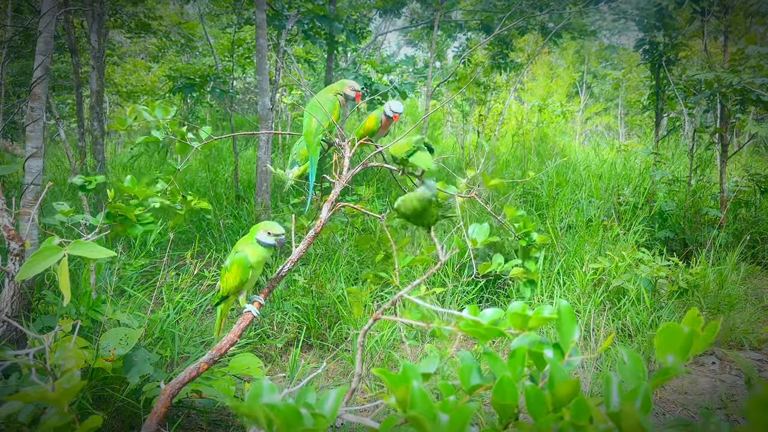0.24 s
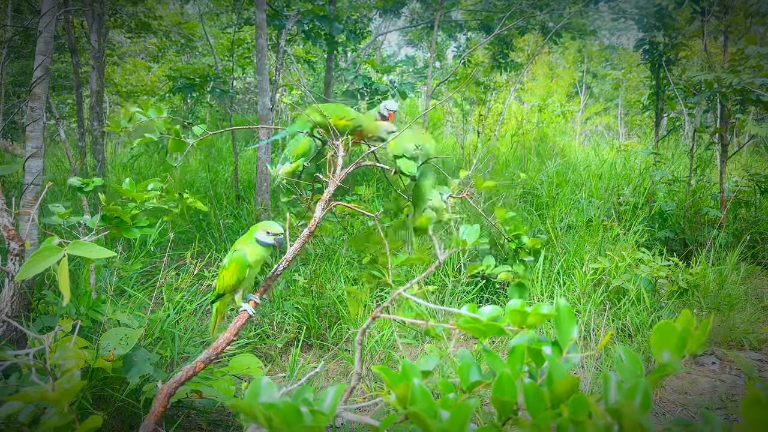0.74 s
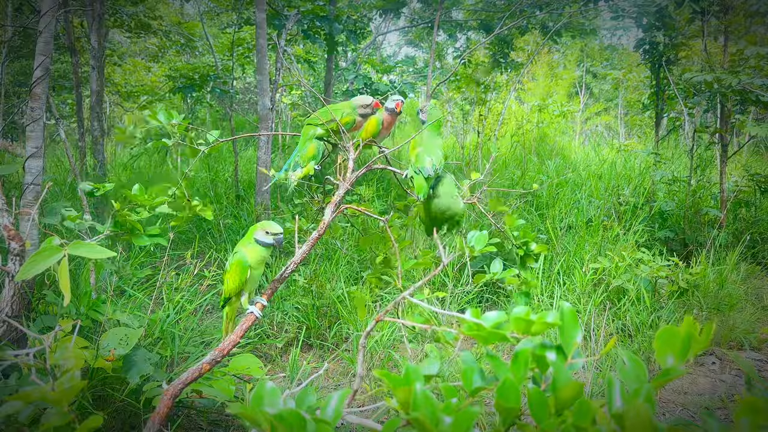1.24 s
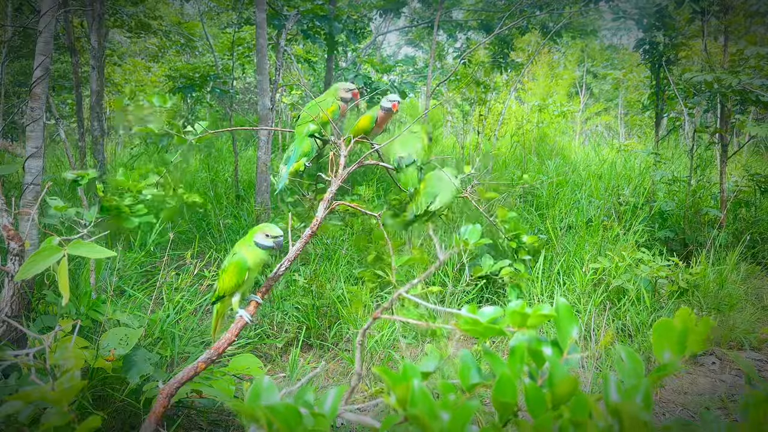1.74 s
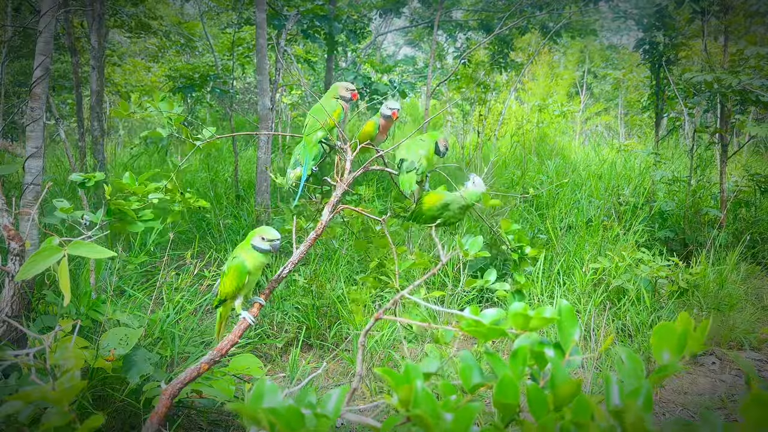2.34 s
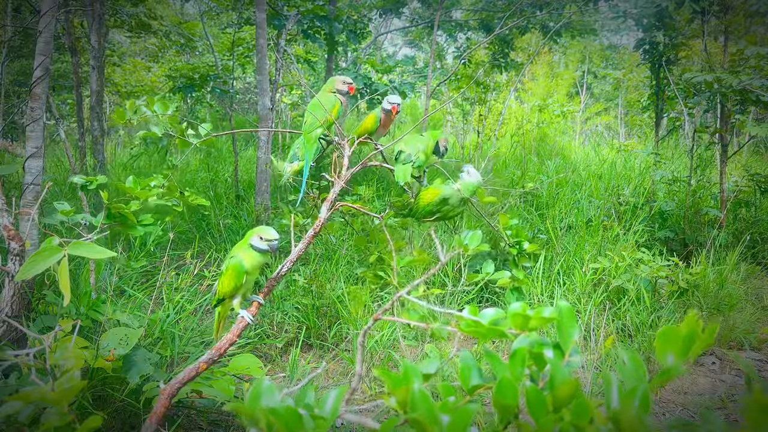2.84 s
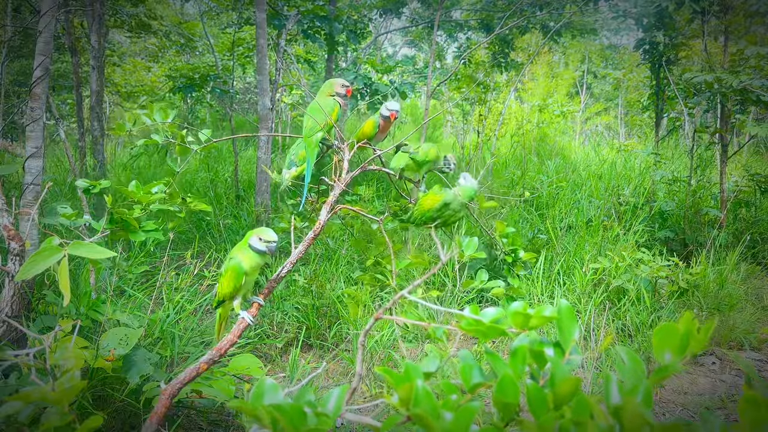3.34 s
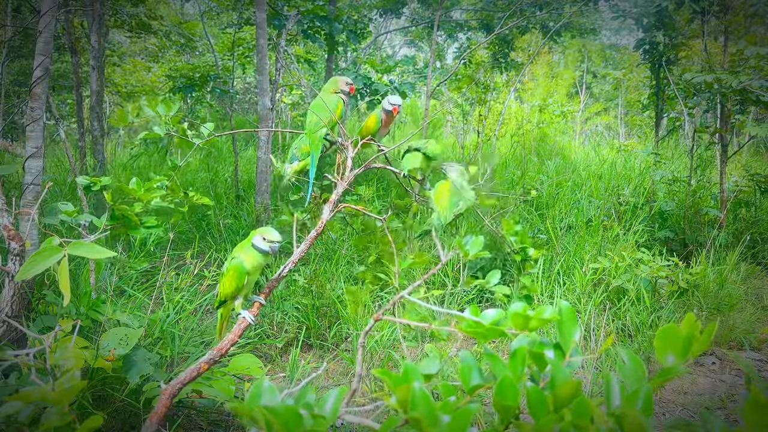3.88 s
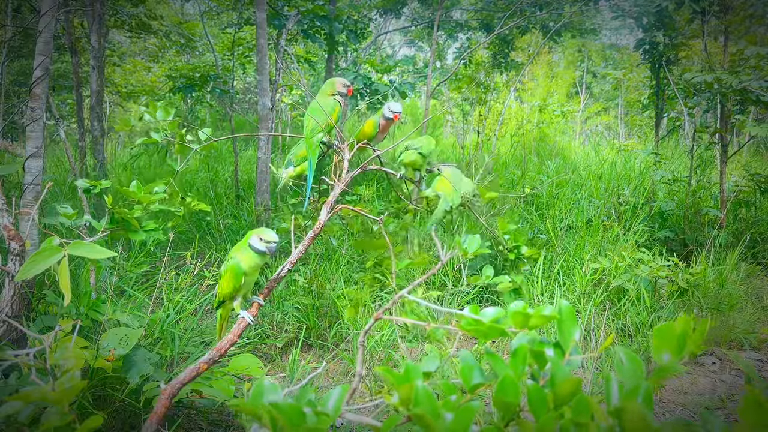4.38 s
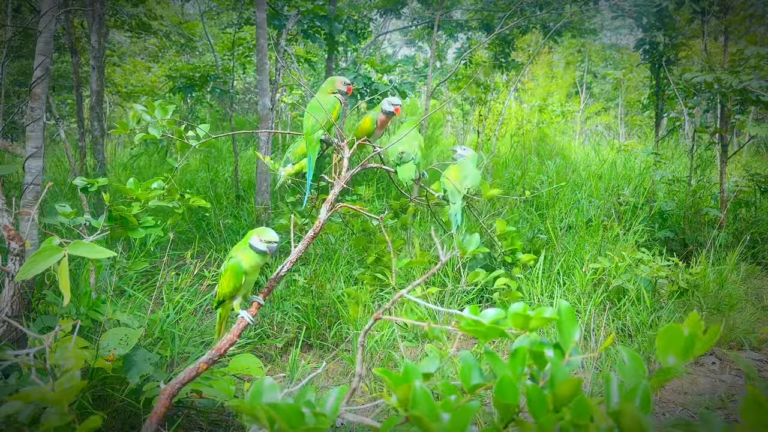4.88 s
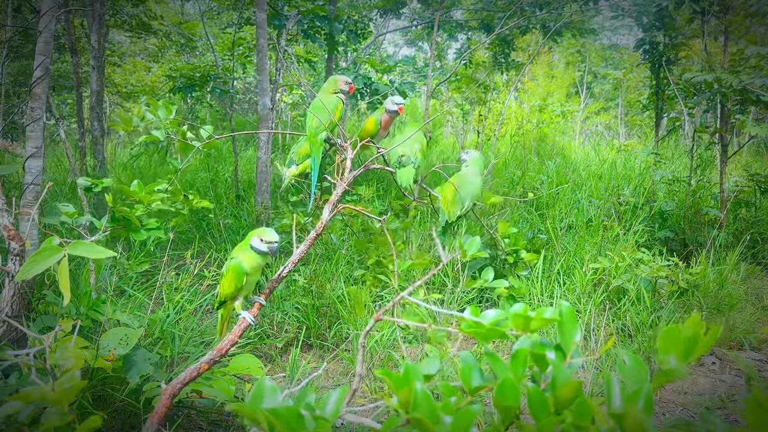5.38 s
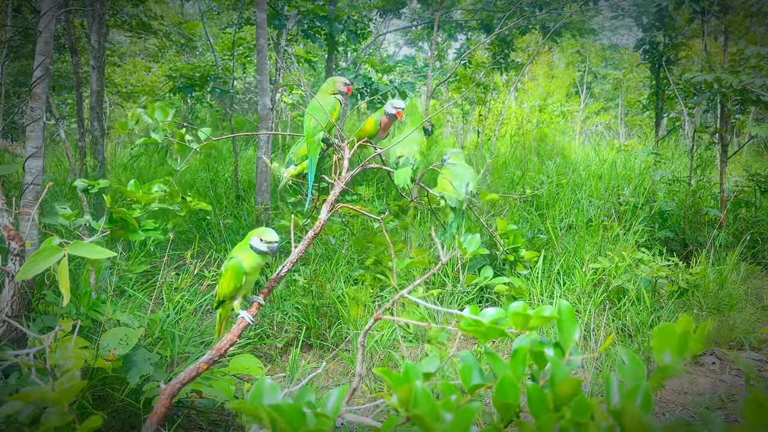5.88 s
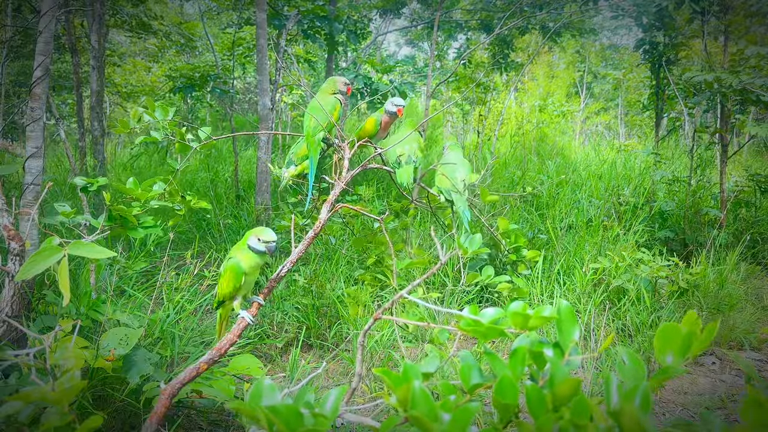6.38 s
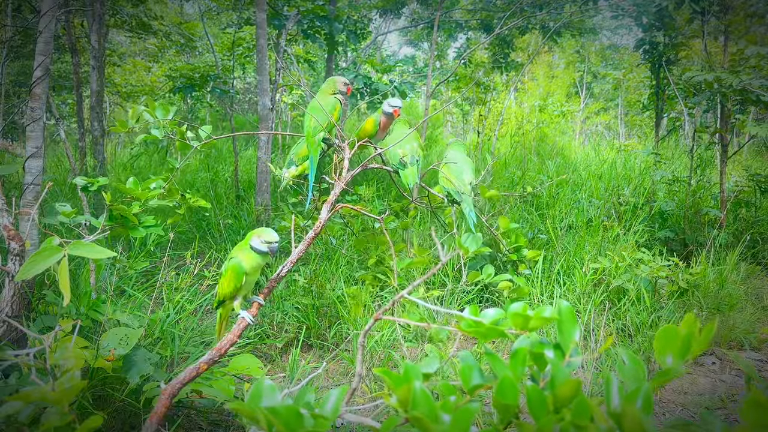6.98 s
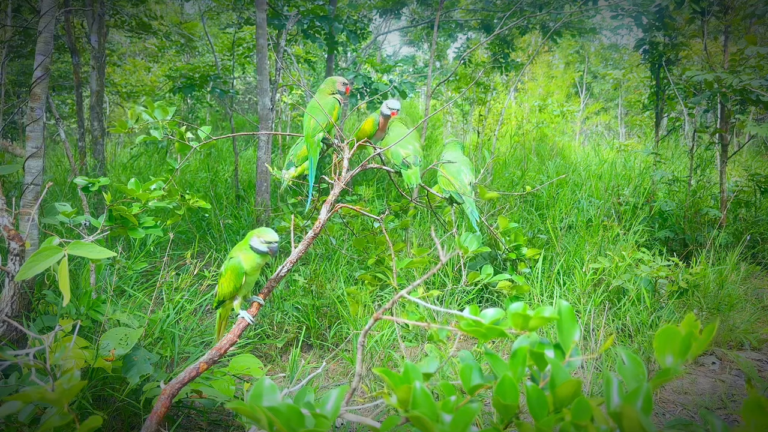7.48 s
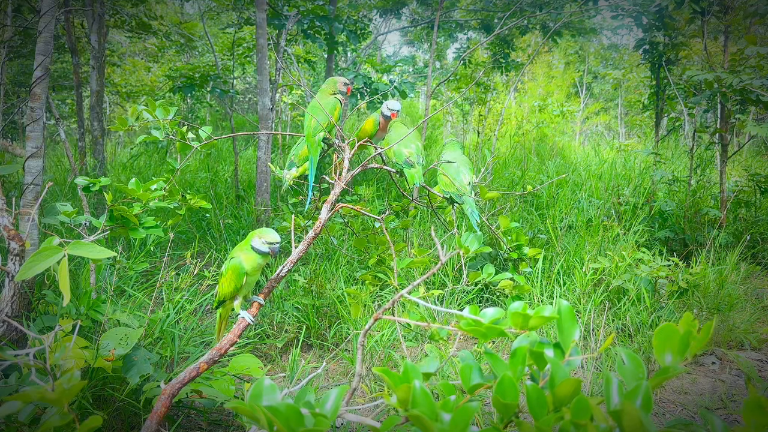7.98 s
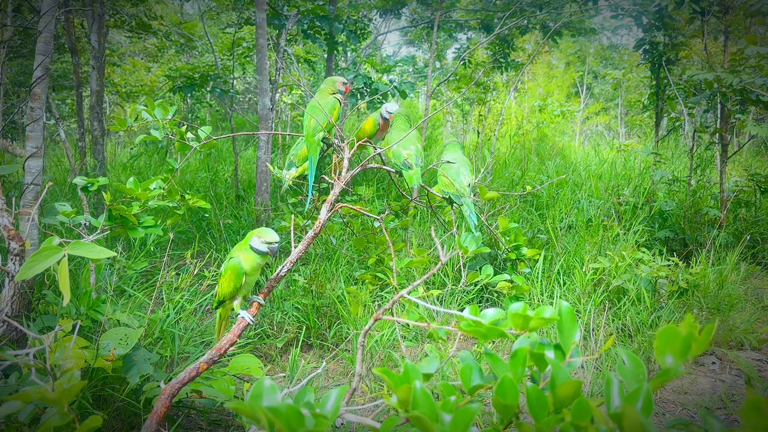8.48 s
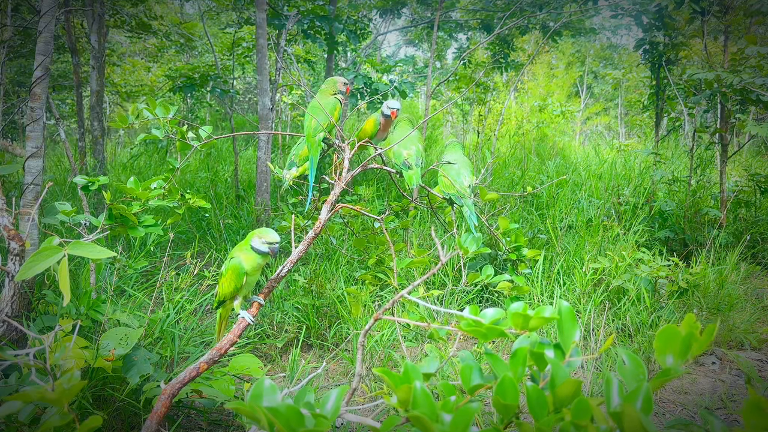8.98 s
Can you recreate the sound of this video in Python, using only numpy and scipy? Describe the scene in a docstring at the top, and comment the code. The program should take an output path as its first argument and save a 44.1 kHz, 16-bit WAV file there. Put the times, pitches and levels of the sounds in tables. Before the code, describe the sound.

Steady, quiet forest air with a low rumble and a faint short echo from trees. Tiny dry twig clicks open the scene while a distant small bird repeats thin, rising high pips. Nearby parakeets break into quick clucks, nasal buzzes, bent yelps and an octave-cracking screech, pause, then bicker again through a wail and another screech. After a long calm gap, a few soft chuks end it, close and nearly dry.

```python
"""Parakeets bickering in a forest

Parakeets squabble on a branch close by: slow voice pulses make rasps, chuks and chatters,
while a fast-beating voice sings pitched yelps, wails and screeches that crack up about an octave.
A small bird farther off pips with a thin sliding whistle; claws and twigs tick with a snap and a short ring.
Shaped noise makes the soft forest hiss, and a fading noise tail gives the faint echo of the trees."""
import sys
import numpy as np
from scipy import signal
from scipy.fft import rfft, irfft, next_fast_len
from scipy.io import wavfile

SR = 44100
rng = np.random.default_rng(int(sys.argv[2]) if len(sys.argv) > 2 else 0)


def dump_mix(stems):
    """Bounce the given channels to the path in sys.argv[1] as a 16-bit WAV at rate SR."""
    frames = np.atleast_2d(stems).T  # one column per channel
    limited = np.clip(frames, -1, 1)  # hard clip at full scale
    pcm = np.round(limited * 32767).astype(np.int16)
    wavfile.write(sys.argv[1], SR, pcm)


N = 407043  # length in samples
EDGE_HZ = 15850  # top of the recorded band


def amp(db):
    """Turns decibels into a gain."""
    return 10 ** (np.asarray(db) / 20)


def evened(x):
    """Scales a sound to an average (rms) strength of 1."""
    return x / np.sqrt(np.mean(x ** 2) + 1e-20)


def ramp(x):
    """Holds x between 0 and 1."""
    return np.clip(x, 0, 1)


def bump(t, width):
    """A bell curve of height 1 around t = 0."""
    return np.exp(-(t / width) ** 2)


def read(points, hz):
    """Reads a curve between its points, with frequency on a log scale."""
    f, value = np.transpose(points)
    return np.interp(np.log(hz + 1), np.log(f + 1), value)


def add(mix, s, sound):
    """Mixes a sound in at time s, in seconds."""
    part = mix[max(round(s * SR), 0):][:len(sound)]
    part += sound[:len(part)]


def played(source, events):
    """Lays the events of one source along the time line."""
    track = np.zeros(N)
    for event in events:
        add(track, *source(event))
    return track


def wobble(size, hz):
    """A smooth random curve of rms about 1; changes much faster than hz are faded out."""
    padded = next_fast_len(size + 2048, True)
    f = np.fft.rfftfreq(padded, 1 / SR)
    spectrum = rfft(rng.standard_normal(padded)) * np.exp(-(f / hz) ** 2)
    return evened(irfft(spectrum, padded))[:size]


def colour(x, gain_db, size=1024):
    """Filters x by a gain in dB given as a function of frequency, with no sound before its cause."""
    f = abs(np.fft.fftfreq(size, 1 / SR))
    log_gain = np.log(amp(np.maximum(gain_db(f), -100)))
    # the Hilbert transform finds the phase that packs the response after time zero
    taps = np.fft.ifft(np.exp(np.conj(signal.hilbert(log_gain)))).real
    return signal.fftconvolve(x, taps[:size // 2])


def low_cut_db(f, cut_hz):
    """Steep loss, up to 40 dB, below the lowest note that a small throat can radiate."""
    return np.minimum(10 * np.log10(1 + (cut_hz / (f + 1)) ** 8), 40)


def swell(u, crest, rise_db, fall_db, curve=1.87):
    """Level in dB of a note that grows to a crest and dies away; u runs from 0 to 1."""
    crest = np.clip(crest, .05, .95)
    before, after = ramp(1 - u / crest), ramp((u - crest) / (1 - crest))
    return -rise_db * before ** curve - fall_db * after ** curve


# tone balance of the forest air: pitch_hz, relative_level_db
AIR = [(15, -60), (25, -32), (41, -24), (64, 1.5), (148, -1), (222, -3), (316, -4), (352, -5), (749, -6),
       (834, -4.5), (1060, -5), (5090, -9), (7830, -19), (8730, -26), (15800, -47.5)]
AIR_LEVEL_DB = -59.5


def air():
    """Steady forest hiss over a low rumble: random noise shaped in frequency."""
    size = next_fast_len(N, True)
    hz = np.fft.rfftfreq(size, 1 / SR)
    spectrum = rfft(rng.standard_normal(size)) * amp(read(AIR, hz))
    return amp(AIR_LEVEL_DB) * evened(irfft(spectrum, size)[:N])


# echo of the trees: pitch_hz, time_to_fade_60_db_s
TREES = [(400, 0.29), (1500, 0.42), (3000, 0.39), (8000, 0.57), (14000, .2)]


def forest(x, near_db=3, near_fade_s=0.11):
    """Nearby leaves scatter a quick echo; the trunks return a longer, fainter one."""
    hz, t, noise = signal.stft(rng.standard_normal(SR), SR, nperseg=256)
    trunks = amp(-60 * t / read(TREES, hz)[:, None])
    leaves = amp(near_db - 60 * t / near_fade_s)
    late = t > .004  # the echo leaves out the first moment
    tail = signal.istft(noise * (trunks + leaves) * late, SR, nperseg=256)[1]
    return signal.fftconvolve(x, tail / np.linalg.norm(tail))[:N]


# claws and twigs: start_s, peak_db, snap_db (noise of the snap, before the whole tick is set to its peak)
TICKS = [(.02, -37.5, -16), (0.42, -40, -3), (.515, -33.5, -18), (0.524, -30, -14), (.537, -33, -12),
         (.578, -32.5, -14), (.592, -34.5, -13), (0.613, -36.5, -10), (.637, -38, -13), (3.468, -35.5, 7),
         (3.498, -36.5, -8), (3.796, -37, -1)]
# ringing tones of a twig: pitch_hz (before a random shift), relative_level_db, time_to_fade_60_db_s
TWIG = [(1550, 8, .012), (2220, 2, 0.0097), (3350, 9, .009), (4200, 3, 0.0092), (4540, -2.5, 0.027)]


def tick(row, snap_fade_s=.0006):
    """A tiny noise snap and the short ring of a twig, tuned a little differently each time."""
    s, peak_db, snap_db = row
    t = np.arange(1024) / SR
    ring = np.zeros(len(t))
    for hz, db, fade_s in TWIG:
        shifted_hz = hz * rng.uniform(0.866, 1.13)
        ring += amp(db - 60 * t / fade_s) * np.sin(2 * np.pi * shifted_hz * t)
    snap = amp(snap_db) * rng.standard_normal(len(t)) * np.exp(-t / snap_fade_s)
    click = ring + snap
    return s, amp(peak_db) * click / abs(click).max()


# pips of the small bird: start_s
PIPS = [0.216, .474, 0.713, 1.02, 1.267, 1.527, 2.592, 2.775, 2.99, 3.194, 3.392, 3.613, 3.815, 4.024,
        4.272, 4.626, 4.84]
PIP_DB = -58.5
# each pip begins near PIP_HZ; early ones begin higher and the series settles
PIP_HZ, PIP_EAGER_HZ, PIP_SETTLE_S = 7410, 650, 0.69


def pip(s, length=0.018, rise_hz=850):
    """A thin whistle that slides up, levels off and fades."""
    start_hz = PIP_HZ + PIP_EAGER_HZ * np.exp(-s / PIP_SETTLE_S)
    u = np.linspace(0, 1, int(length * SR))
    turns = np.cumsum(start_hz + rise_hz * np.sin(np.pi * u / 2)) / SR
    whistle = np.sqrt(2) * np.sin(2 * np.pi * turns)
    return s, amp(PIP_DB - 5 * u) * whistle * signal.windows.tukey(len(u), .5)


# the throat with the beak nearly shut, also used for the breath noise of squawks: pitch_hz, gain_db
NARROW_THROAT = [(300, -8.5), (600, -7), (1250, -1.5), (1750, 3), (2150, -2.5), (2650, -2), (3600, -1.5),
                 (4900, -1), (5600, -10), (6500, -21.5), (7900, -21.5), (10000, -28), (11000, -34),
                 (15500, -39)]


def pulsed(s, length, first_hz, last_hz, rough, level_db, crest, bright, cut_hz, throat_hz, beak_hz,
           jitter=.18, uneven_db=1.5, puff_turns=0.44, puff_gain=1.7, rise_db=11, fall_db=16,
           scatter_s=.0012, scatter_gain=0.56, peak_db=6.0, throat_width_hz=340, beak_width_hz=560):
    """Separate pulses of the voice organ, each with a puff of noise, ring the throat and the beak."""
    size = int(max(length, .004) * SR)
    u, rough = np.linspace(0, 1, size), ramp(rough)
    # a rougher voice has a shakier pulse rate
    shake = np.exp((0.022 + jitter * rough) * wobble(size, 400))
    hz = (first_hz + (last_hz - first_hz) * u) * shake
    turns = np.cumsum(hz) / SR - .05
    pulses = np.sinc((turns - np.round(turns)) * SR / hz)
    # harsher puffs last longer
    puffs = rng.standard_normal(size) * np.exp(-(turns % 1) / (puff_turns * (1 + rough)))
    drive = (1 - rough) * evened(pulses) + puff_gain * rough * evened(puffs)
    shape_db = swell(u, crest, rise_db, fall_db, curve=1.47)
    drive *= amp(shape_db + uneven_db * rough * wobble(size, 220))

    def throat_db(f):
        """Two resonances differ from note to note; brightness tilts the treble and a low cut thins the bass."""
        throat_peak = 1 / (1 + ((f - throat_hz) / throat_width_hz) ** 2)
        beak_peak = 1 / (1 + ((f - beak_hz) / beak_width_hz) ** 2)
        tilt_db = bright * np.log2(np.maximum(f / 1500, 1))
        return read(NARROW_THROAT, f) + peak_db * (throat_peak + beak_peak) + tilt_db - low_cut_db(f, cut_hz)

    # the branch and nearby leaves scatter each pulse within a few milliseconds
    t = np.arange(256) / SR
    scatter = rng.standard_normal(len(t)) * np.exp(-t / scatter_s)
    direct = t == 0
    echoes = scatter_gain * scatter * (t > 0) / np.linalg.norm(scatter)
    voice = signal.fftconvolve(colour(drive, throat_db), direct + echoes)
    return s, amp(level_db) * voice / np.sqrt((voice ** 2).sum() / size)


# runs of tiny clucks: start_s, clucks (count), first_gap_s, gap_growth (times per cluck), level_db (first cluck),
# gain_per_cluck_db, brightness_db_per_octave, throat_hz, beak_hz
CHATTERS = [(1.311, 7, .016, .91, -46, 0, -2.5, 1720, 5200),
            (4.857, 5, 0.017, .97, -45, 1.43, -1, 1214, 4970),
            (6.2107, 7, .0098, 1.15, -45.5, 0.26, -7.5, 1320, 2900)]
CLUCK_SHARE = 0.67  # a cluck fills this share of its gap
CLUCK_FIRST_HZ, CLUCK_LAST_HZ, CLUCK_CUT_HZ = 550, 440, 610


def chatter(row, rough=0.46, crest=0.1):
    """A run of pulsed clucks that steadily quickens or slows."""
    s, count, first_gap, growth, level_db, step_db, bright, throat_hz, beak_hz = row
    gaps = first_gap * growth ** np.arange(round(count))
    run = np.zeros(SR)
    for k, gap in enumerate(gaps):
        cluck = pulsed(gaps[:k].sum(), CLUCK_SHARE * gap, CLUCK_FIRST_HZ, CLUCK_LAST_HZ, rough,
                       level_db + k * step_db, crest, bright, CLUCK_CUT_HZ, throat_hz, beak_hz)
        add(run, *cluck)
    return s, run


# short clucking notes: start_s, length_s, first_pitch_hz, last_pitch_hz, level_db, brightness_db_per_octave
CHUKS = [(1.044, 0.02, 1640, 1820, -36.5, -1), (1.231, 0.0095, 481, 375, -40.5, 1.5),
         (1.265, 0.016, 404, 400, -51, 9), (1.284, .019, 1447, 1003, -33, 0),
         (1.393, 0.016, 803, 597, -43.5, -3.5), (1.407, 0.015, 610, 505, -36, 2),
         (1.438, .019, 379, 294, -36.5, 1.5), (1.469, 0.022, 806, 633, -25.5, 0.5),
         (1.48, 0.042, 1267, 932, -36, -2), (1.547, 0.025, 417, 362, -45, 0.5),
         (1.603, 0.0062, 690, 600, -34.5, 0.5), (1.614, 0.0094, 910, 697, -27, 3.5),
         (1.627, 0.025, 797, 607, -35.5, -1.5), (1.649, .025, 715, 600, -40.5, -1.5),
         (1.808, 0.014, 1094, 524, -34.5, -12.5), (4.357, 0.026, 623, 303, -37.5, -6.5),
         (4.527, .017, 700, 573, -35.5, -5), (4.541, 0.018, 650, 808, -35, -5),
         (4.783, 0.031, 1020, 787, -35, -1.5), (5.447, 0.015, 602, 506, -35, -7),
         (5.468, 0.015, 650, 550, -43.5, -4.5), (6.115, 0.0115, 750, 803, -34.5, -0.5),
         (6.162, 0.0045, 500, 450, -53, -6), (6.323, 0.027, 355, 497, -39, -5.5),
         (6.34, 0.027, 536, 886, -29, -4.5), (6.485, .019, 1170, 560, -46.5, -18),
         (8.537, .015, 864, 743, -36.5, -4), (8.57, 0.0088, 746, 700, -50.5, -8),
         (8.592, 0.012, 594, 400, -50.5, -6), (8.852, 0.0083, 1196, 850, -36.5, -5.5),
         (8.889, 0.023, 856, 562, -44.5, -5), (9.105, 0.013, 756, 792, -34, -4),
         (9.143, 0.031, 727, 477, -48.5, -6)]
# the throat opens with the effort of a chuk: level_db, throat_hz
CHUK_THROAT = [(-38, 1090), (-35, 2530)]
# the shortest chuks are the noisiest, longer ones settle into a voice: length_s, roughness_0_to_1
CHUK_SETTLING = [(.011, 0.43), (.017, 0.31), (.026, .12)]
# the beak opens with brightness: brightness_db_per_octave, beak_hz
CHUK_BEAK = [(-7, 2200), (-0.5, 4360)]
CHUK_CREST, CHUK_CUT_HZ = 0.22, 510  # place of the crest (0-1), low cut


def chuk(row):
    """A quick gliding burst of pulses; louder raises the throat resonance, brighter raises the beak's."""
    s, length, first_hz, last_hz, level_db, bright = row
    rough = np.interp(length, *np.transpose(CHUK_SETTLING))
    throat_hz = np.interp(level_db, *np.transpose(CHUK_THROAT))
    beak_hz = np.interp(bright, *np.transpose(CHUK_BEAK))
    return pulsed(s, length, first_hz, last_hz, rough, level_db, CHUK_CREST, bright,
                  cut_hz=CHUK_CUT_HZ, throat_hz=throat_hz, beak_hz=beak_hz)


# rasps and nasal buzzes: start_s, length_s, pulse_rate_hz (mid-note), roughness_0_to_1, level_db,
# crest_place_0_to_1, brightness_db_per_octave, throat_hz
RASPS = [(0.768, .095, 265.3, 0.27, -41.5, .08, -4.5, 1780), (1.058, 0.069, 152, 0.68, -28, 0.33, 5, 1940),
         (1.888, 0.12, 139.1, 0.61, -31, 0.37, 2.5, 1700), (2.048, 0.052, 138, 0.34, -41, 0.28, -2, 1120),
         (2.089, 0.0404, 300, 0.4, -40.5, 0.8, -3.5, 1680), (2.146, .035, 232, 0.8, -43.5, 1, -4.5, 1140),
         (2.608, 0.071, 349, 0.4, -40.5, 0.14, -2, 1310), (2.774, 0.12, 172.3, .6, -49, 0.25, -6, 1150),
         (2.803, 0.013, 347, 0.27, -40, 0.3, -1, 1350), (2.919, .055, 174.2, 0.58, -52, 0.83, -7, 1100),
         (4.449, 0.062, 214, 0.42, -51, 0.17, -9.5, 1310), (4.572, 0.029, 394, 0.07, -40.5, 0.15, -1, 1090),
         (5.361, 0.093, 342.7, 0.03, -42, 0.14, -8.5, 1550),
         (6.391, 0.072, 437, 0.15, -35, 0.32, -2.5, 1510)]
RASP_SLOWING, RASP_BEAK_HZ = .06, 3870  # the rate starts this share above its middle and ends as far below
# the low cut climbs for each dB above a loud rasp
RASP_CUT_HZ, LOUD_RASP_DB, CUT_HZ_PER_DB = 320, -39, 42
# the swell grows by RASP_EXTRA_SWELL dB for each dB of push
RASP_RISE_DB, RASP_FALL_DB, RASP_EXTRA_SWELL = 8, 15.5, 0.5


def rasp(row):
    """A run of slow pulses that slows a little; loud rasps swell further and lose their bass."""
    s, length, hz, rough, level_db, crest, bright, throat_hz = row
    push_db = max(level_db - LOUD_RASP_DB, 0)
    extra_db = RASP_EXTRA_SWELL * push_db
    return pulsed(s, length, hz * (1 + RASP_SLOWING), hz * (1 - RASP_SLOWING), rough, level_db, crest, bright,
                  cut_hz=RASP_CUT_HZ + CUT_HZ_PER_DB * push_db, throat_hz=throat_hz, beak_hz=RASP_BEAK_HZ,
                  rise_db=RASP_RISE_DB + extra_db, fall_db=RASP_FALL_DB + extra_db, beak_width_hz=840)


# the throat with the beak wide open: pitch_hz, gain_db
OPEN_THROAT = [(400, 1), (800, -7.5), (1200, -4), (1650, 0.5), (2200, -5.5), (3000, 3), (3500, -2.5),
               (4600, 1), (5900, -9), (7100, -19.5), (8600, -18), (10200, -31), (13000, -32.5),
               (15500, -40)]


def squawk(t, hz, level_db, rough, bright, beak_hz, jitter=0.058, shimmer=0.3, rasp_share=0.37,
           beak_db=9, beak_width_hz=600, full_db=-33, dulling=0.66):
    """A fast-beating voice sounds through the open throat; strain shakes its pitch and adds breath noise."""
    rough, bright = ramp(rough), bright * np.ones(len(t))
    turns = np.cumsum(hz * (1 + (0.0045 + jitter * rough) * wobble(len(t), 530))) / SR
    # harmonic levels are worked out at every 16th sample
    order, slow = np.arange(1, 19)[:, None], slice(None, None, 16)
    f = order * hz[slow]
    shape_db = read(OPEN_THROAT, f) + bright[slow] * np.log2(np.clip(f, 1000, 7000) / 1000)
    shape_db += beak_db / (1 + ((f - beak_hz) / beak_width_hz) ** 2)
    # a soft voice loses its top harmonics: dulling is dB lost per dB below full_db
    shape_db += dulling * np.minimum(level_db[slow] - full_db, 0) * np.clip((f - 5000) / 1500, 0, 1)
    height = amp(shape_db) * (f < EDGE_HZ)
    height /= np.sqrt((height ** 2).sum(0) / 2)
    tone = np.zeros(len(t))
    for k, harmonic in enumerate(height, 1):
        # staggered phases keep the harmonics from peaking together
        tone += np.interp(t, t[slow], harmonic) * np.cos(2 * np.pi * k * turns - np.pi * k ** 2 / 10)
    tone *= 1 + shimmer * np.sqrt(rough) * wobble(len(t), 330)
    # breath noise comes in puffs, one each cycle
    puffs = rng.standard_normal(len(t)) * (1 + np.cos(2 * np.pi * turns))
    hiss = evened(colour(puffs, lambda f: read(NARROW_THROAT, f) - low_cut_db(f, 1350))[:len(t)])
    voice = (tone + (0.0048 + rasp_share * rough) * hiss) / np.sqrt(1 + rough / 2)
    return t[0], amp(level_db) * voice * signal.windows.tukey(len(t), .03)


# quick bends of pitch: start_s, length_s, first_hz, turn_hz, last_hz, turn_place_0_to_1,
# level_db (at the crest), crest_place_0_to_1, brightness_db_per_octave, beak_hz
YELPS = [(1.747, 0.035, 1496, 1236, 1420, 0.78, -22, 0.38, 1.5, 2500),
         (1.773, 0.034, 1530, 1241, 1460, 0.69, -21.5, 0.13, -3, 2630),
         (2.068, 0.038, 986, 870, 1150, 0.55, -43, 0.5, -12, 1000),
         (2.108, 0.037, 824, 918, 426, .3, -36.5, 0.78, -5, 1720),
         (4.303, 0.022, 1436, 1304, 1760, 0.6, -32, 0.16, -3.5, 4930),
         (4.328, 0.028, 1620, 1145, 1650, 0.5, -30, 0, -6, 2530),
         (4.705, .034, 1680, 2290, 1900, 0.4, -38, 1, -9, 2200),
         (4.738, 0.049, 1685, 1575, 1628, 0.66, -20.5, 0.71, 1, 3980),
         (5.425, .026, 516, 544, 881, 0.1, -37.5, 1, -5, 2400),
         (6.453, 0.038, 1685, 1890, 1650, 0.85, -44.5, .2, -14, 1800)]
YELP_RISE_DB, YELP_FADE_DB = 14, 12
YELP_ROUGH, YELP_FRAY = 0.12, 0.092  # roughness at the turn, and what is added toward both ends


def yelp(row, bend_curve=1.69):
    """A short note whose pitch swings to a turning point and away again, cleanest at the turn."""
    s, length, first_hz, turn_hz, last_hz, turn, level_db, crest, bright, beak_hz = row
    t = np.arange(0, length, 1 / SR)
    u, turn = t / length, np.clip(turn, .05, .95)
    before = ramp(1 - u / turn) ** bend_curve
    after = ramp((u - turn) / (1 - turn)) ** bend_curve
    hz = turn_hz + (first_hz - turn_hz) * before + (last_hz - turn_hz) * after
    shape_db = swell(u, crest, YELP_RISE_DB, YELP_FADE_DB)
    rough = YELP_ROUGH + YELP_FRAY * (before + after) ** 2
    return squawk(s + t, hz, level_db + shape_db, rough, bright, beak_hz)


# notes held and then falling: start_s, length_s, pitch_hz (at the start), drift_hz_per_s, fall_length_s,
# roughness_0_to_1, level_db (at the crest), swell_db, crest_place_0_to_1, brightness_db_per_octave, beak_hz
WAILS = [(1.061, 0.063, 1087, 200, 0.013, 0.47, -29.5, 0.5, 0.79, 0, 2180),
         (2.21, .249, 1049, 399, .105, 0.07, -33.5, 11, 0.82, -3, 3830),
         (2.961, .22, 988, -600, .14, 0.12, -41, 10, 0.69, -2, 1300),
         (4.954, 0.23, 1231, -680, 0.083, 0.02, -26, 38.5, 0.58, -1, 3970)]
WAIL_FADE_DB = 22.5  # level lost after the crest
WAIL_FALL, WAIL_FRAY = .38, 0.76  # as the breath runs out: share of pitch lost, roughness gained


def wail(row, fall_curve=1.4, fall_dulling=4):
    """A held note that sinks, frays and dulls as the breath runs out."""
    s, length, hz, drift, fall_s, rough, level_db, swell_db, crest, bright, beak_hz = row
    t = np.arange(0, length, 1 / SR)
    spent = ramp(1 - (length - t) / fall_s)
    pitch = (hz + drift * t) * (1 - WAIL_FALL * spent ** fall_curve)
    shape_db = swell(t / length, crest, swell_db, WAIL_FADE_DB)
    return squawk(s + t, pitch, level_db + shape_db, rough + WAIL_FRAY * spent,
                  bright - fall_dulling * spent, beak_hz)


# low notes that break up about an octave: break_s, length_after_break_s, low_pitch_hz, high_pitch_hz,
# drift_hz_per_s, mid_note_droop_hz, level_db (before the dips and lifts below), fade_db
SCREECHES = [(2.213, .139, 775, 1462, -300, 65, -16, 17), (6.57, .145, 830, 1532, -850, -0.5, -17, 17.5)]
LOW_NOTE_S, SCOOP_S, BREAK_S = .034, .016, 0.0037  # the low note scoops up to pitch, then cracks
TIRE_S, DROOP_AT_S, DROOP_S = 0.087, 0.046, 0.014  # the high note fades and droops
# a last push dips the pitch just before the release
FLICK_LEAD_S, FLICK_S, RELEASE_S = 0.022, 0.0083, 0.0087


def screech(row, scoop_depth=0.45, flick_depth=0.118, release_lift=0.4, low_db=-1, low_swell_db=7,
            scoop_db=19, crack_db=8, flick_db=8, release_db=20, bright=2.5, low_dulling=5,
            tired_dulling=6, beak_hz=2600):
    """Scoops to a low note that swells and brightens, cracks up about an octave, tires and ends with a flick."""
    s, length, low_hz, high_hz, drift, droop_hz, level_db, tired_db = row
    t = np.arange(-LOW_NOTE_S, length, 1 / SR)
    # phases of the call, each 0-1
    low = (1 - np.tanh(t / BREAK_S)) / 2
    early = ramp(-t / LOW_NOTE_S)
    crack = bump(t, BREAK_S)
    scoop = ramp(1 - (t + LOW_NOTE_S) / SCOOP_S)
    tired = 1 - bump(np.maximum(t, 0), TIRE_S)
    flick = bump(t - length + FLICK_LEAD_S, FLICK_S)
    release = ramp(1 - (length - t) / RELEASE_S)
    held_hz = high_hz + drift * t - droop_hz * bump(t - DROOP_AT_S, DROOP_S)
    held_hz *= 1 - flick_depth * flick + release_lift * release
    scooped_hz = low_hz * (1 - scoop_depth * scoop ** 1.47)
    hz = low * scooped_hz + (1 - low) * held_hz
    opening_db = low_db * low - low_swell_db * early - scoop_db * scoop ** 2 - crack_db * crack
    closing_db = flick_db * flick - tired_db * tired - release_db * release
    rough = .012 + 0.089 * low + 0.62 * (scoop + crack) + 0.13 * flick + 0.25 * release
    brightness = bright - low_dulling * early - tired_dulling * tired
    return squawk(s + t, hz, level_db + opening_db + closing_db, rough, brightness, beak_hz)


def scene():
    """Near parakeets, nearly dry; the small bird farther off, with more echo for its level."""
    far = played(pip, PIPS)
    bickering = played(chatter, CHATTERS) + played(chuk, CHUKS) + played(rasp, RASPS)
    squawks = played(yelp, YELPS) + played(wail, WAILS) + played(screech, SCREECHES)
    near = played(tick, TICKS) + bickering + squawks
    echo = forest(amp(-18) * near + amp(-4) * far)
    return (air() + echo + far + near)[None]


def record(dry):
    """Limits the sound to the recorder's band with a steep low-pass filter."""
    low_pass = signal.firwin(511, EDGE_HZ, window=("kaiser", 9), fs=SR)
    return signal.oaconvolve(dry, low_pass[None], "same")


dry = scene()
out = record(dry)
dump_mix(out)
```